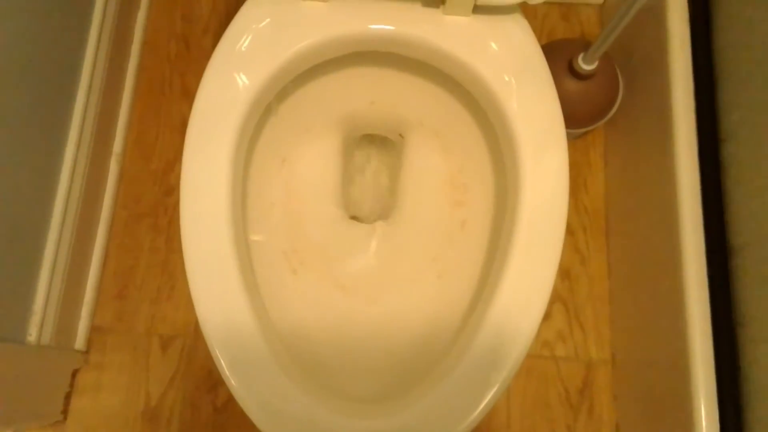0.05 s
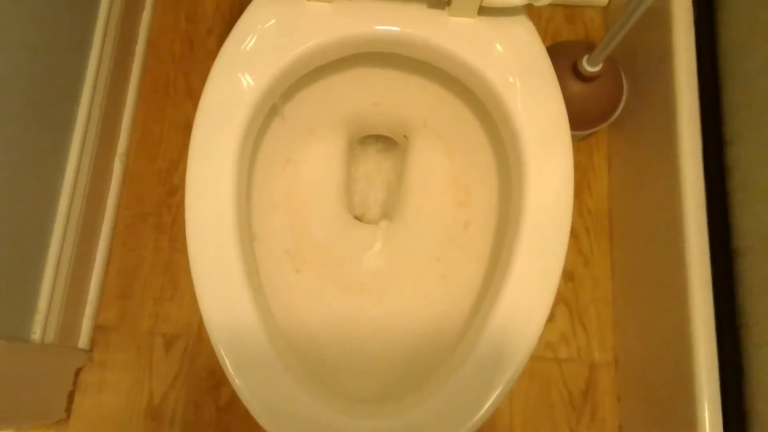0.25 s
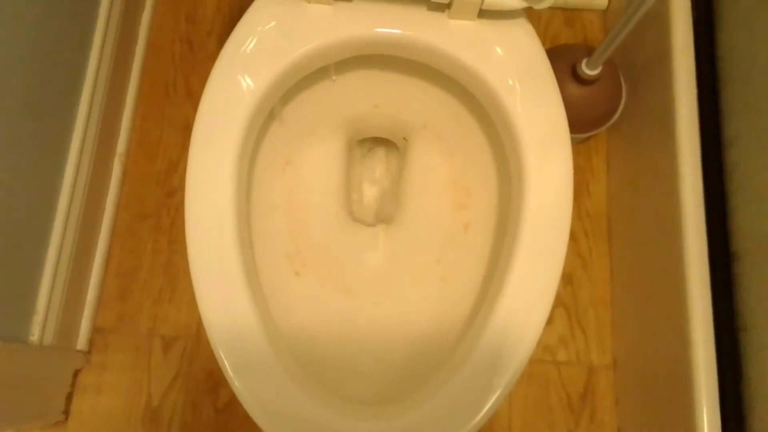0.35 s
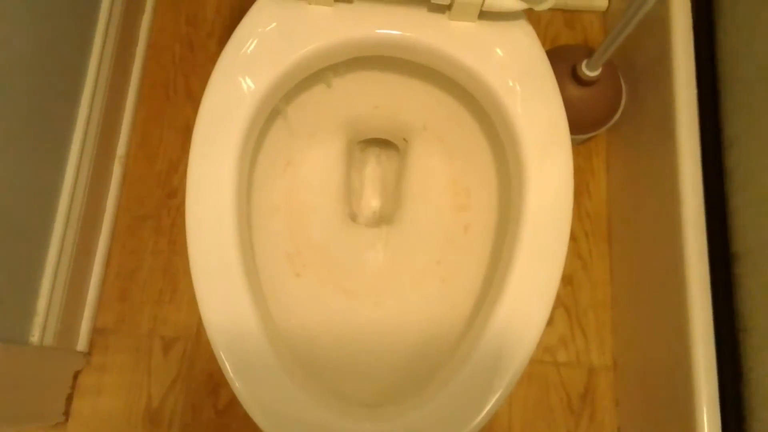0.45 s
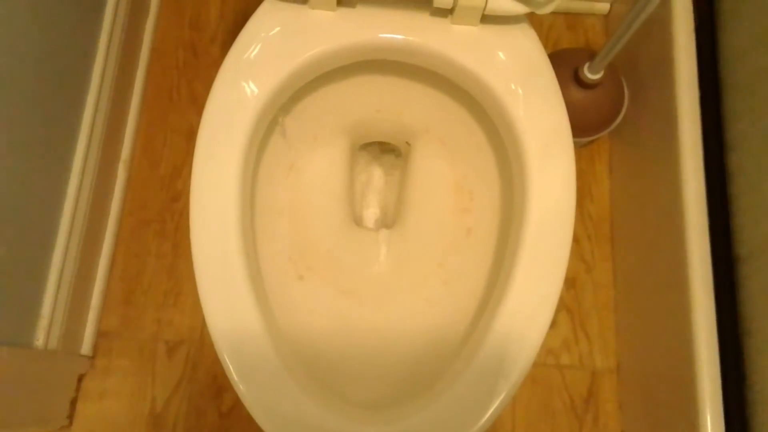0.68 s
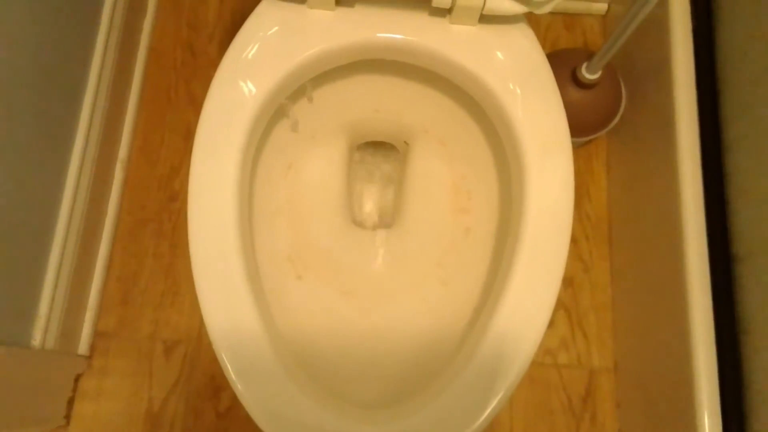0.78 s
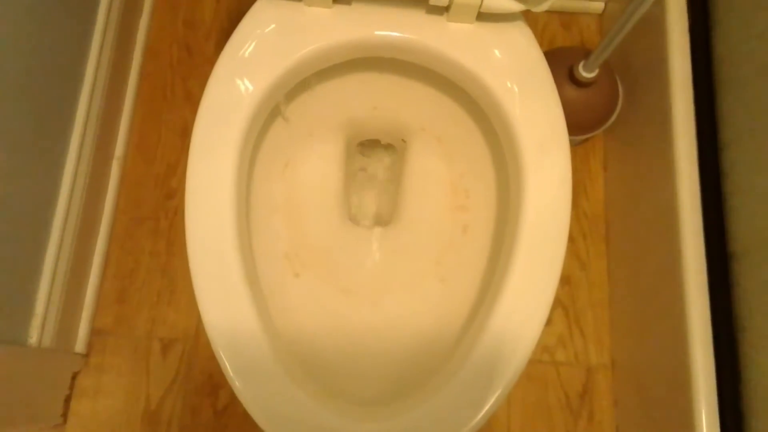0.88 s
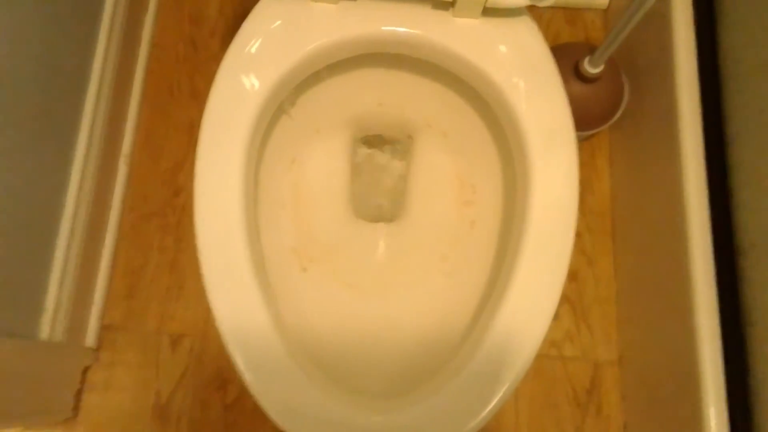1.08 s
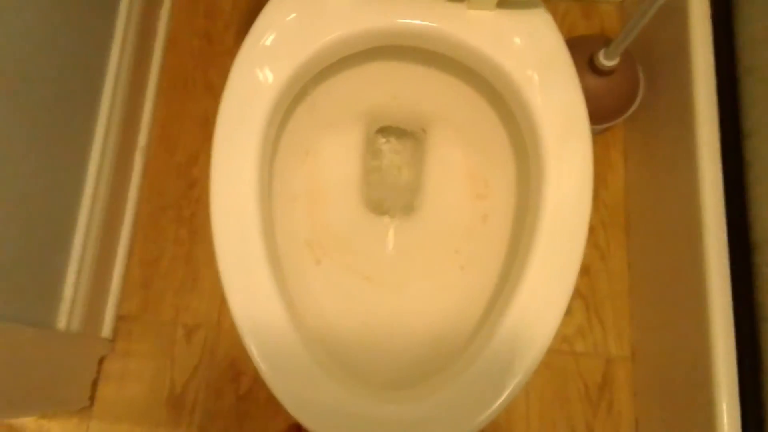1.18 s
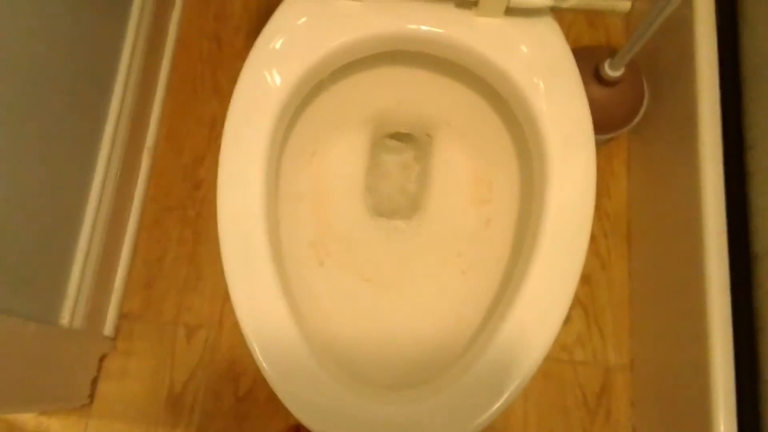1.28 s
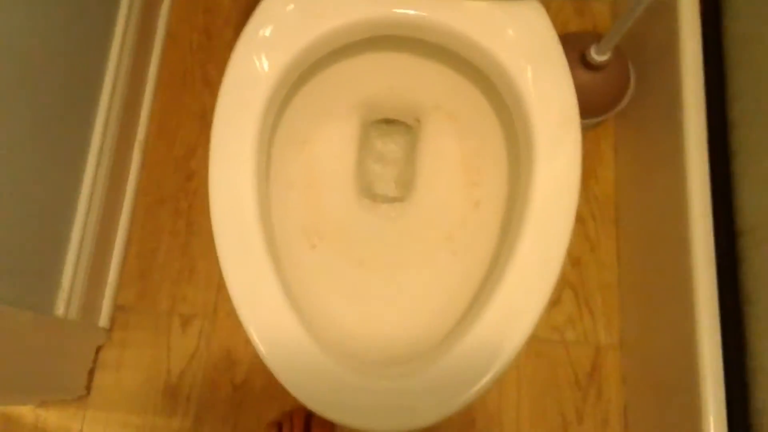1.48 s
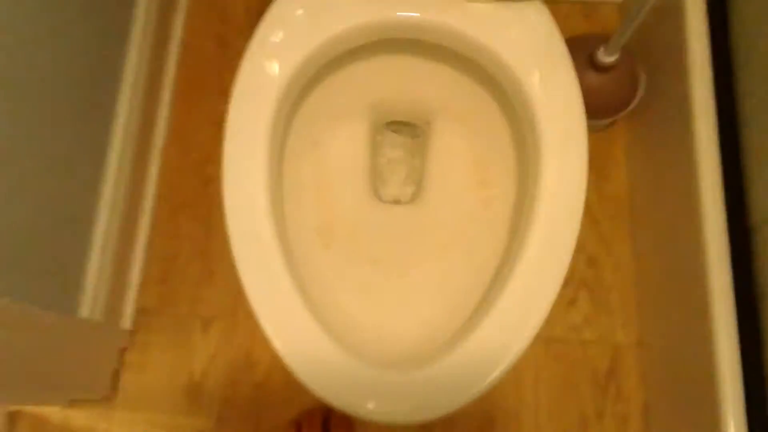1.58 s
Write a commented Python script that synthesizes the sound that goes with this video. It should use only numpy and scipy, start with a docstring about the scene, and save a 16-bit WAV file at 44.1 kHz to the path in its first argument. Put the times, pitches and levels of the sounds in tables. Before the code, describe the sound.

A toilet flush ends with hollow gulps and splashy gurgles, then thins to faint refill hiss

```python
"""End of a toilet flush

In a small hard bathroom the trap gulps air: single gliding tones from low gulps to high plinks are bubbles and
their echoes, froth and spray are swarms of small bubbles, splashes are short noise bursts. All ring in the hollow
bowl (resonances) and echo from the walls (decaying noise). Behind them: drain rumble (low resonant noise), the
steady, slightly whistling hiss of the cistern refill (coloured noise) and a thin wavering supply-pipe hum (sine)."""
import sys
import numpy as np
from scipy import signal
from scipy.fft import rfft, irfft, next_fast_len
from scipy.io import wavfile
from scipy.ndimage import uniform_filter1d, map_coordinates

SR = 44100
rng = np.random.default_rng(int(sys.argv[2]) if len(sys.argv) > 2 else 0)


def inscribe(sig):
    """Save sig as 16-bit PCM at rate SR to the path in sys.argv[1].

    A 1-D sig is mono; a 2-D sig holds one channel per row.
    Samples are clipped to [-1, 1] before scaling.
    """
    pcm = np.round(np.clip(np.atleast_2d(sig).T, -1, 1) * 32767)
    wavfile.write(sys.argv[1], SR, pcm.astype(np.int16))


N = 72765  # samples

# Bubble and splash levels apply before bowl and room; all levels apply before the microphone.
TONE_DB = -1.5
SWELL = 4.97  # a bubble peaks at time scale / SWELL
FROTH_DB, FROTH_PER_S, FROTH_HZ, FROTH_OCT, FROTH_CYCLES = -9.5, 1100, 767, 0.771, 4.7
SPRAY_DB, SPRAY_PER_S, SPRAY_HZ, SPRAY_OCT, SPRAY_CYCLES = -6.5, 3500, 2603, 0.618, 3.25
MAX_SMALL_BUBBLES = 5000  # limits the spray rate
SMALL_SPREAD_DB = 2.5  # scale of the log-random levels
LOWEST_HZ = 258  # largest bubble of froth or spray
TOP_HZ = 7250  # limit of small bubbles and microphone
RISE = 0.14  # fractional pitch climb of small bubbles over one time scale, as they surface
THUMP_DB, THUMP_HZ, THUMP_WIDTH_HZ = 24.5, 69.6, 42
REFILL_DB, REFILL_PATCHY_DB = -41, 1.9
HUM_HZ, HUM_DB, HUM_WAVER_DB, HUM_WAVER_PER_S = 212.6, -54, 4.5, 5.2
SPLASH_DB, SPLASH_ATTACK_S = 1.5, 0.0015
DIRECT_DB, DIRECT_HZ = -2, 1150  # the bowl hides the low part of the direct sound
ROOM_DB, ROOM_DELAY_S = -0.5, 0.006


def amp(db):
    """Amplitude ratio of a level in dB."""
    return 10 ** (np.asarray(db) / 20)


def unit(x):
    """Scale to rms 1."""
    return x / np.sqrt(np.mean(x ** 2) + 1e-20)


def along(points, hz):
    """Interpolate (f/Hz, value) points on a log frequency axis."""
    f, v = np.transpose(points)
    return np.interp(np.log(hz + 1), np.log(f + 1), v)


def filtered(x, response):
    """Apply a complex frequency response."""
    m = next_fast_len(N + SR)
    spectrum = rfft(x, m) * response(np.fft.rfftfreq(m, 1 / SR))
    return irfft(spectrum, m)[..., :N]


def peak(f, hz, width_hz):
    """Response of a causal resonance with peak gain 1."""
    return 1j * f * width_hz / (hz * hz - f * f + 1j * f * width_hz)


def churn():
    """Level curves of froth, spray and drain rumble in dB, one value per sample."""
    # Agitation of the water: t/s, froth level/dB, spray level/dB, rumble level/dB (before offsets)
    churn_levels = [(0.0, -33.5, -33.5, -64), (0.064, -47.5, -45.5, -71.5), (0.11, -41.5, -39.5, -75.5),
                    (0.182, -46, -35.5, -72.5), (0.234, -25.5, -38.5, -59), (0.274, -28, -31.5, -59),
                    (0.306, -19.5, -36.5, -58.5), (0.362, -25, -36.5, -77), (0.404, -28.5, -34, -74.5),
                    (0.44, -41.5, -34.5, -63), (0.476, -15.5, -30.5, -45), (0.5, -23, -36, -52.5),
                    (0.564, -36.5, -30.5, -57), (0.574, -16, -25, -53), (0.62, -43, -36.5, -61.5),
                    (0.642, -48, -32, -72), (0.68, -20, -29.5, -55.5), (0.712, -27.5, -36, -55),
                    (0.868, -41.5, -38, -77.5), (1.12, -43, -41.5, -72), (1.24, -47.5, -39, -75.5),
                    (1.342, -46.5, -41.5, -63), (1.622, -50.5, -43.5, -72.5), (1.65, -52, -60, -64.5)]
    s, *levels_db = np.transpose(churn_levels)
    t = np.arange(N) / SR
    return [np.interp(t, s, db) for db in levels_db]


def blips(s, hz, db, life_s, glide, size):
    """Sum of gliding sines that swell to their peak level and die."""
    t = np.arange(size) / SR
    u = t / life_s[:, None]
    bend = 1 + (glide[:, None] - 1) * np.minimum(u, 2) / 2
    phase = 2 * np.pi * hz[:, None] * t * bend
    envelope = SWELL * u * np.exp(2 - 2 * np.sqrt(SWELL * u))  # peak 1
    wave = amp(db)[:, None] * envelope * np.sin(phase)
    at = np.round(s * SR).astype(int)[:, None] + np.arange(size)
    return np.bincount(at.ravel(), wave.ravel(), N + size)[:N]


def swarm(per_s, mid_hz, octaves, cycles, size):
    """Small bubbles at random times and log-normal pitches, rms 1; higher ones die sooner."""
    u = rng.random((MAX_SMALL_BUBBLES, 2))
    hz = mid_hz * 2 ** (octaves * rng.standard_normal(MAX_SMALL_BUBBLES))
    within_count = np.arange(MAX_SMALL_BUBBLES) < per_s * N / SR
    keep = within_count & (hz > LOWEST_HZ) & (hz < TOP_HZ)
    hz = hz[keep]
    s = u[keep, 0] * N / SR
    db = -SMALL_SPREAD_DB * np.log(0.09 + u[keep, 1])
    glide = np.full(len(hz), 1 + RISE)
    return unit(blips(s, hz, db, cycles / hz, glide, size))


def gulps():
    """Single tones of bubbles and their echoes, plus froth and spray that follow the churn."""
    # Single gliding tones, low gulps to high plinks:
    # t/s, f/Hz, peak level/dB (before offset), decay time scale/s, pitch ratio after one time scale
    single_tones = [(.001, 354, -41, 0.013, 0.98), (.001, 2255, -34.5, 0.014, 0.92),
                    (.086, 1140, -34.5, 0.0054, 0.95), (.096, 1194, -34.5, 0.033, 1.07),
                    (.196, 1220, -33.5, 0.024, 1), (.22, 344.2, -28, 0.021, .98),
                    (.235, 287, -32, 0.016, 0.9), (.247, 1173, -22.5, 0.0077, .96),
                    (0.253, 1940, -21, 0.0054, 1), (.292, 616, -19, .011, 0.99),
                    (0.306, 1485, -26, 0.012, 1.1), (0.327, 297, -22.5, 0.015, 1.45),
                    (.335, 358.6, -19.5, 0.0062, 1.02), (.354, 1290, -16.5, 0.0073, 0.84),
                    (.356, 2178, -30, 0.013, 0.99), (.386, 1170, -27, 0.0082, 0.86),
                    (0.416, 321, -29.5, 0.018, 0.79), (0.455, 338.5, -21, .015, 1.05),
                    (.471, 787, -19.5, 0.0095, 0.96), (.49, 722, -26, 0.0062, 0.81),
                    (.517, 705, -29, 0.0083, 1.1), (.552, 342, -30.5, 0.034, 1.1),
                    (.572, 1266, -10, 0.0026, 1.02), (.573, 2977, -16.5, 0.0025, 1.02),
                    (.578, 913, -19, .006, 1.2), (.581, 1934, -26.5, 0.009, 1.),
                    (.592, 728, -35.5, 0.0057, 0.86), (0.599, 1245, -21, 0.009, 1.2),
                    (.662, 677, -27, 0.011, 1.1), (.673, 999.2, -16.5, 0.021, 1.1),
                    (0.673, 1780, -18, .006, 0.94), (.677, 332.3, -21.5, 0.012, 1.02),
                    (.721, 875, -20, 0.0058, 1.1), (.75, 2047, -33.5, .03, 1.08),
                    (.798, 4140, -37.5, .004, 1.4), (.951, 272, -35.5, .035, 1.01),
                    (.952, 331, -41.5, 0.024, 1.11), (.972, 688, -37, 0.008, 1.),
                    (1.085, 719, -38.5, 0.014, 1.02), (1.088, 2310, -34, .004, 1.36),
                    (1.1, 1010, -34.5, 0.011, 1.13), (1.109, 1079, -33, 0.0081, 1.01),
                    (1.133, 1830, -36, 0.0068, 0.84), (1.131, 2455, -31, 0.015, 0.93),
                    (1.15, 2450, -41.5, 0.033, 1.), (1.231, 215, -52, 0.032, 0.96),
                    (1.278, 3660, -32, 0.0065, 0.91), (1.292, 3750, -43, 0.023, 1.1),
                    (1.313, 1432, -38.5, 0.021, 0.77), (1.461, 211, -49, .02, 1)]
    s, hz, db, life_s, glide = np.transpose(single_tones)
    froth_db, spray_db, _ = churn()
    froth = swarm(FROTH_PER_S, FROTH_HZ, FROTH_OCT, FROTH_CYCLES, size=1500)
    spray = swarm(SPRAY_PER_S, SPRAY_HZ, SPRAY_OCT, SPRAY_CYCLES, size=300)
    tones = blips(s, hz, db + TONE_DB, life_s, glide, size=4000)
    return tones + amp(froth_db + FROTH_DB) * froth + amp(spray_db + SPRAY_DB) * spray


def thump():
    """Drain-pipe rumble: noise through a low resonance applied twice, following the churn."""
    rumble_db = churn()[2]
    noise = rng.standard_normal(N)
    rumble = unit(filtered(noise, lambda f: peak(f, THUMP_HZ, THUMP_WIDTH_HZ) ** 2))
    return amp(rumble_db + THUMP_DB) * rumble


def refill():
    """Cistern refill: noise, patchy in time and frequency, through the valve's resonances."""
    # Hiss spectrum: f/Hz, relative level/dB
    hiss = [(30, -4), (150, -1), (200, -19.5), (300, -20.5), (640, -12), (1100, -13.5), (1900, -11),
            (3200, -22), (4300, -13.5), (5600, -23), (7000, -37)]
    # Valve resonances: f/Hz, width/Hz, level added relative to hiss/dB
    whistle = [(220.8, 7.5, 22.5), (1176, 10, 15), (1444, 15, 8.5), (1721, 98, 11), (2363, 20, 10.5),
               (2710, 20, 11.5), (4067, 140, 1)]

    def colour(f):
        lift = sum(amp(db) * abs(peak(f, hz, width_hz)) ** 2 for hz, width_hz, db in whistle)
        return amp(along(hiss, f)) * (1 + lift)

    z = signal.stft(rng.standard_normal(N), nperseg=512)[2]
    field = uniform_filter1d(rng.standard_normal(z.shape), size=5, axis=0)  # across frequency
    field = uniform_filter1d(field, size=10, axis=1)  # across time
    noise = signal.istft(z * amp(REFILL_PATCHY_DB * unit(field)), nperseg=512)[1][:N]
    return amp(REFILL_DB) * unit(filtered(noise, colour))


def hum():
    """Supply-pipe hum: a thin low sine with a smooth random level in dB."""
    t = np.arange(N) / SR
    waver = map_coordinates(rng.standard_normal(64), [t * HUM_WAVER_PER_S])
    return amp(HUM_DB + HUM_WAVER_DB * waver) * np.sin(2 * np.pi * HUM_HZ * t)


def splashes():
    """Short bursts of band-limited noise with a fast attack and exponential decay."""
    # Splashes: t/s, level/dB (before offset), centre f/Hz, full width between 1/e gains/octaves, t60/s
    bursts = [(0.164, -39.5, 5100, 0.77, 0.054), (0.219, -26.5, 2500, 4.6, 0.059),
              (0.2223, -20, 1830, 3, 0.028), (.297, -31.5, 3100, 1.2, 0.11),
              (0.322, -29.5, 3630, 1.2, 0.11), (0.352, -32, 4330, 0.91, 0.056),
              (0.455, -19, 866, 1.6, 0.033), (0.471, -30, 3600, 1.5, 0.074), (.54, -37.5, 4000, 1.7, 0.11),
              (.572, -29, 2925, 2.5, 0.082), (0.658, -14, 920, 2.2, .03), (0.675, -27.5, 2600, 3.2, 0.027),
              (.797, -40, 4400, 0.67, .15), (1.007, -43, 4890, 0.41, 0.35), (1.084, -40.5, 1200, 1.9, .2),
              (1.237, -44.5, 3500, 1.1, 0.6), (1.335, -32.5, 5150, 2.7, 0.047)]
    out, t = np.zeros(N), np.arange(N) / SR
    for s, db, hz, octaves, t60_s in bursts:
        noise = rng.standard_normal(N)
        band = unit(filtered(noise, lambda f: np.exp(-(np.log2((f + 1) / hz) / octaves * 2) ** 2)))
        u = np.maximum(t - s, 0)
        attack = 1 - np.exp(-u / SPLASH_ATTACK_S)
        out += amp(db + SPLASH_DB - 60 * u / t60_s) * attack * band
    return out


def bowl(x):
    """Direct sound with its lows shelved down, plus ringing modes of the hollow bowl and trap."""
    # Bowl and trap modes: f/Hz, gain/dB, t60/s
    modes = [(217.3, 12, 0.14), (247.1, 9.5, 0.25), (282.5, 11, 0.48), (337, 10, 0.38), (375.4, 7.5, 0.19),
             (433.4, 5.5, 0.19), (555, 3.5, .2), (589.5, 6.5, .25), (660, 6, 0.16), (708.1, 11.5, 0.18),
             (764.3, 7, 0.17), (839.7, 5, .3), (962.4, 0, 0.2), (1077, 4.5, 0.13), (1179, 1.5, 0.19),
             (1310, 0, .15), (1470, 2.5, 0.15)]

    def response(f):
        direct = (amp(DIRECT_DB) + 1j * f / DIRECT_HZ) / (1 + 1j * f / DIRECT_HZ)
        # width/Hz = ln(1000) / (pi t60)
        ringing = sum(amp(db) * peak(f, hz, np.log(1000) / np.pi / t60_s) for hz, db, t60_s in modes)
        return direct + ringing

    return filtered(x, response)


def room(x):
    """Tiled-room echo: delayed noise tail of unit energy, each frequency dying at its own rate."""
    # Reverberation time: f/Hz, t60/s
    room_t60 = [(200, 0.39), (1000, 0.54), (3000, .35), (7000, 0.75)]
    # Initial tail spectrum, low notes ring in the bowl more than in the room: f/Hz, relative level/dB
    room_colour = [(200, -14), (450, -7), (900, -1.5), (2000, 2), (6000, -0.5)]
    hz, t, z = signal.stft(rng.standard_normal(SR // 2), SR, nperseg=256)
    start_db = along(room_colour, hz)[:, None]
    decay_db = 60 * t / along(room_t60, hz)[:, None]
    tail = signal.istft(z * amp(start_db - decay_db), SR, nperseg=256)[1]
    delayed = np.pad(x, (round(ROOM_DELAY_S * SR), 0))
    return signal.fftconvolve(delayed, tail / np.linalg.norm(tail))[:N]


def scene():
    """Water in bowl and room, over rumble, refill and hum; one channel."""
    water = bowl(gulps() + splashes())
    echo = amp(ROOM_DB) * room(water)
    return (water + echo + thump() + refill() + hum())[None]


def record(dry):
    """Small microphone: little bass, nothing from TOP_HZ up."""
    # Microphone response: f/Hz, gain/dB
    mic = [(40, -38), (170, -13.5), (220, -1.5), (4500, -0.5), (6000, -3.5), (6900, -19), (7100, -24.5),
           (7250, -43.5)]
    return filtered(dry, lambda hz: amp(along(mic, hz)) * (hz < TOP_HZ))


dry = scene()
out = record(dry)
inscribe(out)
```